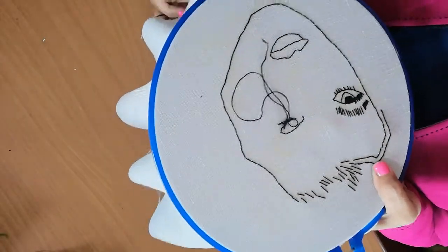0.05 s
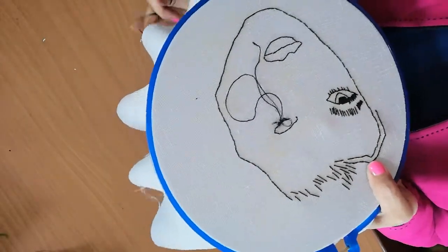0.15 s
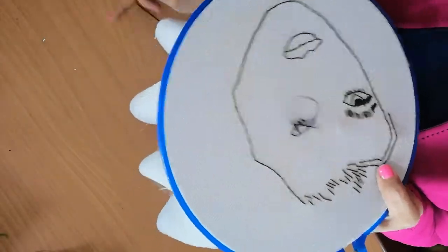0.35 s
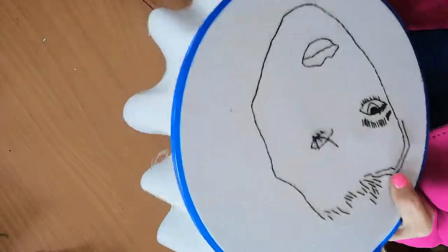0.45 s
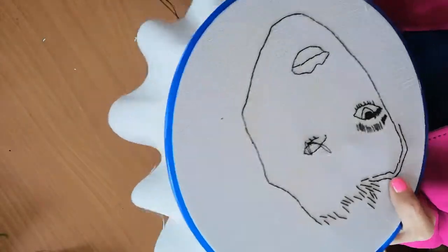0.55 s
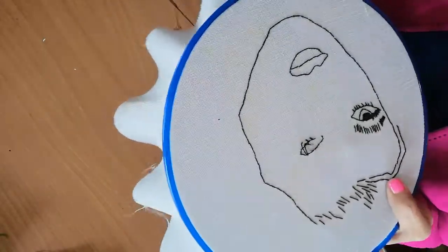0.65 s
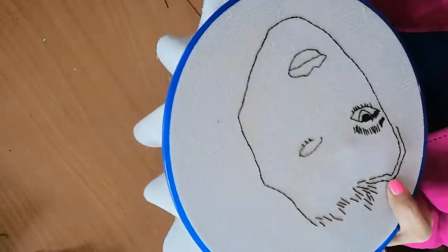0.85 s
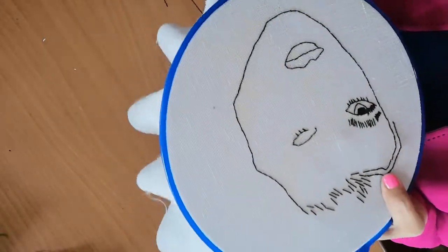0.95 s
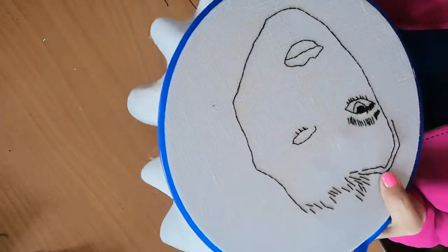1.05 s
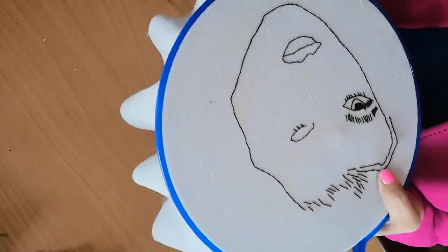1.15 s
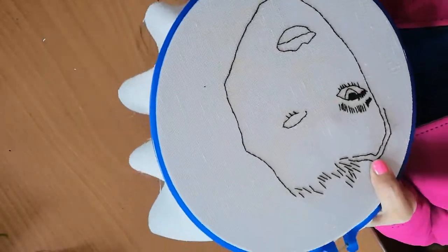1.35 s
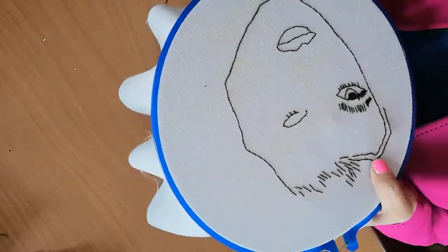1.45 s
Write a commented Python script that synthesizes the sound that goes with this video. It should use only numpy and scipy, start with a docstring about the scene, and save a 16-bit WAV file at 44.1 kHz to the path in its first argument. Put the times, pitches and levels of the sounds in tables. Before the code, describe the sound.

Embroidery thread pops through taut cloth, then slides through with a soft hiss.

```python
"""Embroidery thread drawn through cloth stretched like a drumhead in a hoop, close to the microphone.
The thread catches and pops through twice, plucking the cloth as its fibres snap; then its length slides
through in two soft pulls, whose tiny slips hiss and make the cloth murmur. Slack thread rustles last.
The place is a quiet room, heard in stereo, with a faint low hum and hiss underneath."""
import sys
import numpy as np
from scipy import signal
from scipy.fft import rfft, irfft
from scipy.io import wavfile

SR = 44100
rng = np.random.default_rng(int(sys.argv[2]) if len(sys.argv) > 2 else 0)


def waveform_to_disk(signal):
    """Save audio, clipped to [-1, 1], as 16-bit WAV at the path in sys.argv[1]."""
    frames = np.transpose(np.atleast_2d(signal))
    scaled = np.clip(frames, -1, 1) * 32767
    samples = np.round(scaled).astype(np.int16)
    wavfile.write(sys.argv[1], SR, samples)


N = 66150
TIME = np.arange(N) / SR


def from_db(db):
    """Decibels to gain."""
    return 10 ** (np.asarray(db) / 20)


def level(curve):
    """Gain along a curve of (t/s, level/dB); silent outside it."""
    return from_db(np.interp(TIME, *np.transpose(curve), left=-np.inf, right=-np.inf))


def rms_one(x):
    """Scale to unit power."""
    return x / np.sqrt(np.mean(x ** 2) + 1e-20)


def cut(x, hz, kind, order=2):
    """Butterworth low- or high-pass."""
    return signal.sosfilt(signal.butter(order, hz, kind, fs=SR, output="sos"), x)


def ring(force, hz, t60):
    """One mode: a click starts it at full speed, and it dies by 60 dB in t60 seconds."""
    r, w = np.exp(-np.log(1000) / (t60 * SR)), 2 * np.pi * hz / SR
    return signal.lfilter([1, -1], [1, -2 * r * np.cos(w), r * r], force + 1e-18)


def colour(x, spectrum):
    """Give a steady noise a spectrum of (f/Hz, level/dB); unit power."""
    hz, db = np.transpose(spectrum)
    bins = np.maximum(np.arange(N // 2 + 1) * SR / N, 1)
    gain = from_db(np.interp(np.log(bins), np.log(hz), db))
    return rms_one(irfft(rfft(x) * gain, N))


def widen(mid, side, width):
    """Left and right from a shared and an opposed part."""
    return np.array([mid + width * side, mid - width * side])


def pan(db):
    """Left and right gains, the left louder by db."""
    return from_db([[db / 2], [-db / 2]])


def drift(hz):
    """Slow random wander of unit power."""
    return rms_one(cut(rng.standard_normal(2 * N), hz, "low")[N:])


def click(t, db):
    """One impulse at t seconds."""
    return from_db(db) * (np.arange(N) == int(t * SR)) + 1e-18


# Spectrum of the quiet room: f/Hz, relative level/dB
ROOM_SPECTRUM = [(20, 7), (45, 4.5), (75, -1.5), (110, 1), (150, -6.5), (300, -8), (600, -10.5),
                 (1400, -16), (3500, -21.5), (7000, -28), (9000, -34.5), (15000, -32)]


def room_tone():
    """Soft steady hiss from all around the microphone."""
    noise = widen(*rng.standard_normal((2, N)), width=1)
    return from_db(-66.5) * colour(noise, ROOM_SPECTRUM)


# Swell of the low hum: t/s, level/dB
HUM_SWELL = [(0, -83.5), (.99, -76.5), (1.08, -72.5), (1.33, -71.5), (1.42, -77), (1.5, -84)]


def hum(hz=89, waver_hz=3, waver_db=1.5):
    """A faint low tone in the room, wavering in pitch and level."""
    phase = 2 * np.pi * np.cumsum(hz + waver_hz * drift(8)) / SR
    db = np.interp(TIME, *np.transpose(HUM_SWELL)) + waver_db * drift(8.9)
    return from_db(db) * np.sqrt(2) * np.sin(phase)


# Scatter from hoop and table, then from the room: t60/s, level/dB, low cut f/Hz, high cut f/Hz
ECHO_TAILS = [(0.069, -7.5, 460, 6000), (.25, -10.5, 287, 3000)]


def reflections(x, first_echo_s=0.0039):
    """Dense dying echoes from near and far surfaces, different on each side of the microphone."""
    echoes, t = 0, TIME[:SR // 2]
    for t60, db, low_hz, high_hz in ECHO_TAILS:
        tail = rng.standard_normal((2, len(t))) * np.exp(-np.log(1000) * t / t60) * (t > first_echo_s)
        tail /= np.sqrt(np.sum(tail ** 2) / 2)
        tail = cut(cut(tail, low_hz, "high"), high_hz, "low", order=1)
        echoes = echoes + from_db(db) * signal.fftconvolve(x[None], tail, axes=1)[:, :N]
    return echoes


def back_echo(x, delay_s=.00131, db=-10):
    """The cloth's back radiates with opposite sign and arrives late, carving valleys in the spectrum."""
    lag = round(delay_s * SR)
    return -from_db(db) * np.pad(x, [(0, 0), (lag, 0)])[:, :N]


# Modes of the taut cloth and hoop: f/Hz, plucked level/dB, t60/s, rubbed level/dB (levels relative)
CLOTH_MODES = [(99.4, -6.5, .07, -8), (110.4, 3, 0.091, 12), (169, -12, 0.069, -17.5),
               (204, -14, 0.1, -2.5), (228.9, -40, 0.22, -3.5), (309.2, -4.5, 0.081, -8),
               (345.6, -2.5, 0.077, 0.5), (422, -21.5, .1, -5), (504, -23.5, 0.17, -12.5),
               (677, -31.5, 0.22, -18), (985, -12, 0.055, -10.5), (1145, -44.5, .08, -23.5),
               (1243, -24, 0.13, -20.5), (1620, -23.5, 0.1, -24), (1801, -26.5, 0.085, -32)]


def plucked_cloth(pluck):
    """A pluck rings the cloth like a small drum."""
    return sum(from_db(db) * ring(pluck, hz, t60) for hz, db, t60, _ in CLOTH_MODES)


def rubbed_cloth(drag):
    """Drag keeps the same modes sounding, in alternating sign; unit power."""
    modes = (from_db(db) * ring(drag, hz, t60) for hz, _, t60, db in CLOTH_MODES)
    return rms_one(sum((-1) ** k * mode for k, mode in enumerate(modes)))


# Resonances of the fibres' snap: f/Hz, relative level/dB, t60/s, left minus right/dB
FIBRE_MODES = [(2730, -1.5, 0.0074, -0.5), (3210, -4.5, 0.0063, -6.5), (4610, -21, 0.011, -5),
               (6070, -19.5, 0.0067, -3), (6880, -18.5, 0.0051, -3), (9330, -16, 0.0033, 19.5)]


def fibre_snaps(jerk, grit_t60=.004, grit_db=-12.5, dull_hz=7870):
    """At each jerk the fibres give a sharp crack with a gritty end, a little different left and right."""
    dying = signal.lfilter([1], [1, -np.exp(-np.log(1000) / (grit_t60 * SR))], jerk)
    grit = from_db(grit_db) * dying * rng.standard_normal((2, N))
    force = cut(jerk + grit, dull_hz, "low")
    return sum(from_db(db) * pan(side) * ring(force, hz, t60) for hz, db, t60, side in FIBRE_MODES)


# The thread catches and lets go, twice faintly, then twice clearly:
# t/s, pluck level/dB, pluck high cut f/Hz, snap level/dB, twang f/Hz, twang level/dB
RELEASES = [(0.0137, -54.5, 690, -66.5, 2500, -76), (0.0314, -42, 402.4, -81, 2520, -70),
            (0.202, -32, 2175, -47, 3340, -52), (0.3176, -25, 3300, -26.5, 2720, -54)]


def thread_pops(twang_t60=0.03):
    """Each release plucks the cloth, sets the taut thread twanging and snaps its fibres."""
    pluck = sum(cut(click(t, db), hz, "low") for t, db, hz, *_ in RELEASES)
    twang = sum(ring(click(t, db), hz, twang_t60) for t, *_, hz, db in RELEASES)
    jerk = sum(click(t, db) for t, _, _, db, *_ in RELEASES)
    return plucked_cloth(pluck) + twang + fibre_snaps(jerk)


def slips(per_s=2300, spread_db=1.5):
    """Dense tiny slips of uneven size as fibres pass the weave."""
    sizes = from_db(spread_db * np.minimum(rng.exponential(1, N), 4))
    return sizes * rng.choice([-1, 1], N) * (rng.random(N) < per_s / SR)


# Swell of the running thread's ring: t/s, level/dB
SING_SWELL = [(.33, -77.5), (.36, -69), (.4, -63.5), (.47, -71.5), (.555, -80.5), (.6, -85), (.74, -98),
              (.782, -67.5), (.83, -94), (.86, -100)]


def thread_sing(force, hz=1020, t60=0.019):
    """The slips of the running thread keep up a narrow ring."""
    return rms_one(ring(ring(force, hz, t60), hz, t60)) * level(SING_SWELL)


# How hard the thread rubs, one curve each for two brief tugs and two pulls: t/s, relative level/dB
RUB_CURVES = [
    [(0, -3.5), (.015, -2), (.04, -3), (.05, -9.5), (.075, -31)],
    [(.202, 6), (.209, 2.5), (.222, -1.5), (.232, -12), (.27, -18.5)],
    [(.317, 7.5), (.335, 3), (.36, 0.5), (.402, 1.5), (.432, -5.5), (.478, -7), (.52, -15.5), (.57, -24.5)],
    [(.59, -24.5), (.65, -14), (.69, -9.5), (.75, -11), (.785, -7), (.82, -11), (.839, -8.5), (.852, -18)],
]
# How strongly each of these shakes the cloth: relative level/dB
RUB_SHAKE = [0, 3.5, -1, -1]
# Spectrum of thread rubbing on cloth: f/Hz, relative level/dB
FRICTION_SPECTRUM = [(600, -8), (1050, -19), (1450, -20), (2200, -2), (3050, 4), (4200, -2.5), (5400, 3),
                     (5750, 5), (6150, -3), (8200, -3.5), (9400, -1), (10700, 0), (12000, -4.5),
                     (15000, -8)]
# Last faint rustle of slack thread: t/s, level/dB
SLACK_RUSTLE = [(1.2, -100), (1.3, -87), (1.42, -81), (1.47, -87)]


def sliding_thread(murmur_db=-45.5, hiss_db=-65, dull_hz=1640):
    """Slips shake the cloth and hiss straight at the microphone; returns mono body and stereo hiss."""
    efforts = [level(curve) for curve in RUB_CURVES]
    shake = sum(from_db(db) * effort for db, effort in zip(RUB_SHAKE, efforts))
    force = slips()
    drag = cut(force * shake, dull_hz, "low")
    murmur = from_db(murmur_db) * rubbed_cloth(drag) * np.sqrt(np.mean(shake ** 2))
    friction = colour(widen(force, slips(), width=0.83), FRICTION_SPECTRUM)
    hiss = friction * (from_db(hiss_db) * sum(efforts) + level(SLACK_RUSTLE))
    return murmur + thread_sing(force), hiss * pan(db=-2.5)


def scene():
    """Thread and hoop close up, their reflections around them, the quiet room behind."""
    body, hiss = sliding_thread()
    cloth = thread_pops() + body
    close = cloth + reflections(cloth.mean(axis=0)) + hiss
    return close + back_echo(close) + room_tone() + hum()


def record(dry):
    """The microphone thins the deepest bass and the highest treble; the very top is cut steeply."""
    heard = cut(cut(dry, hz=44.5, kind="high"), hz=11300, kind="low")
    stop_hz = 15600
    return signal.sosfilt(signal.cheby2(16, 60, stop_hz, fs=SR, output="sos"), heard)


dry = scene()
out = record(dry)
waveform_to_disk(out)
```